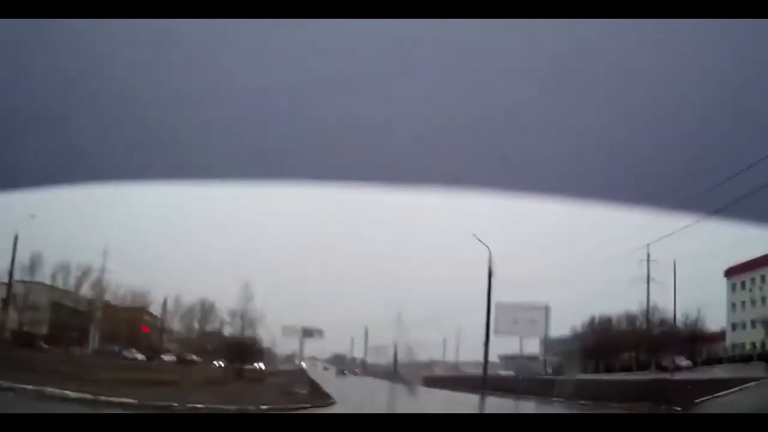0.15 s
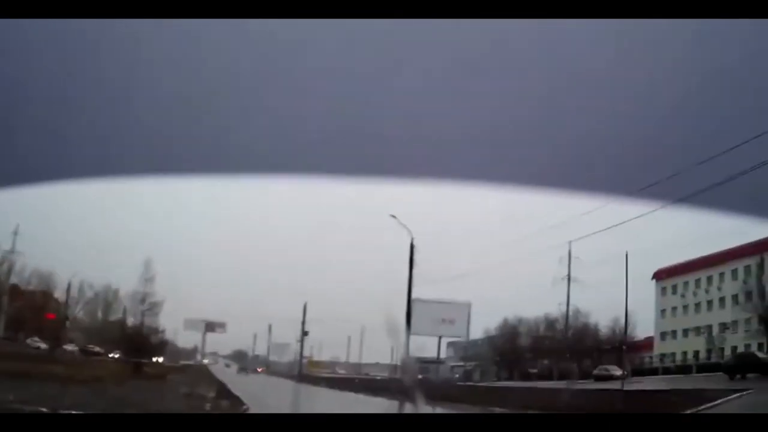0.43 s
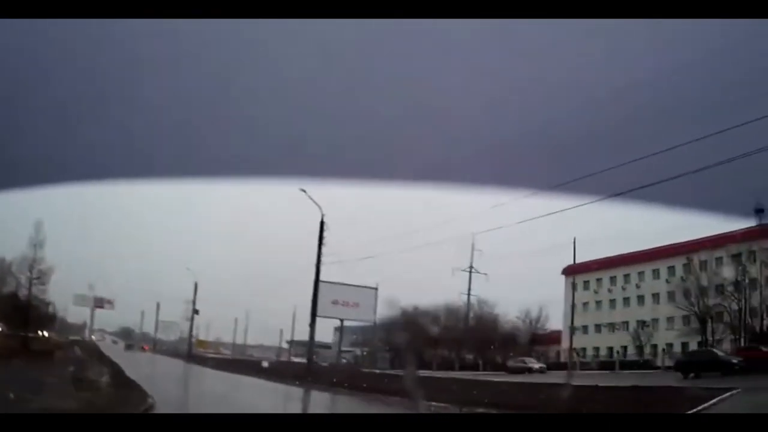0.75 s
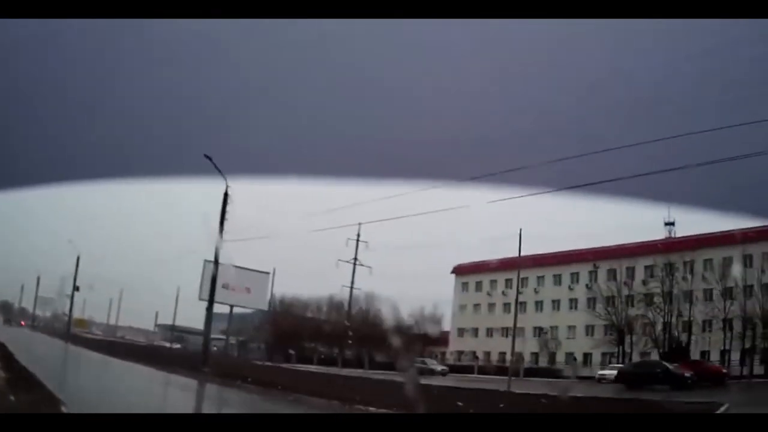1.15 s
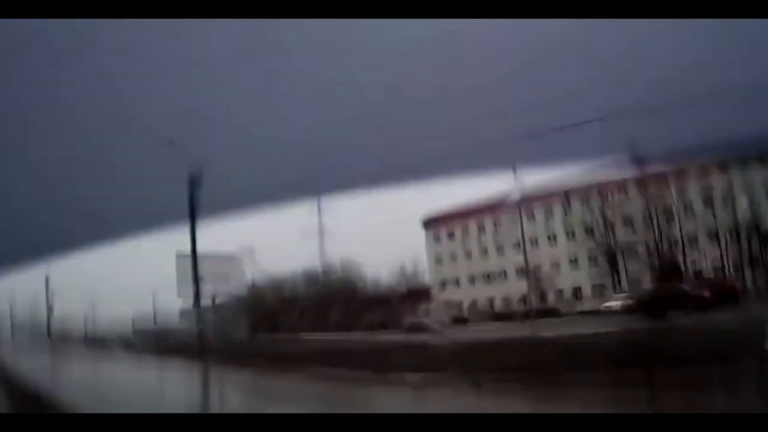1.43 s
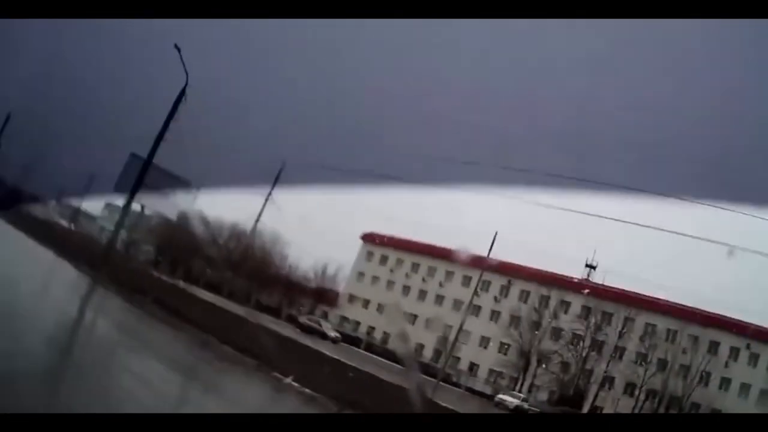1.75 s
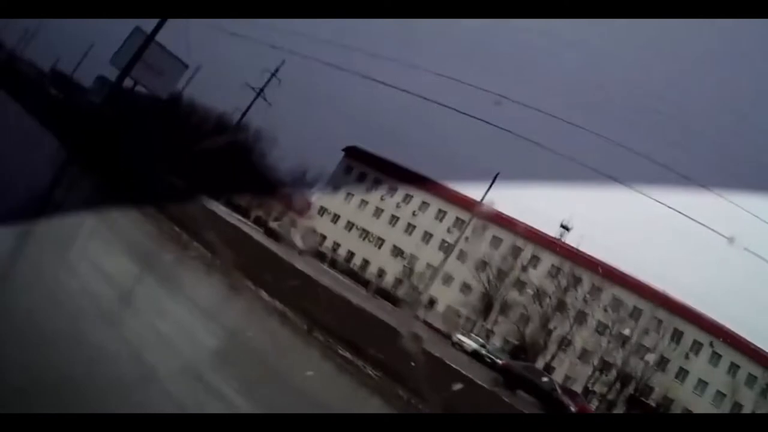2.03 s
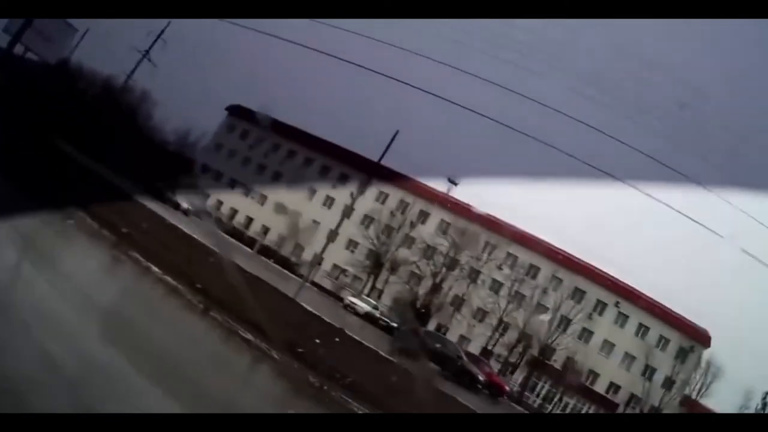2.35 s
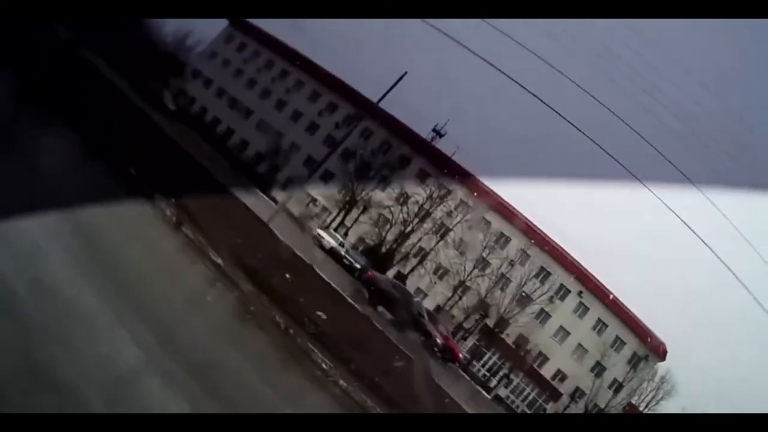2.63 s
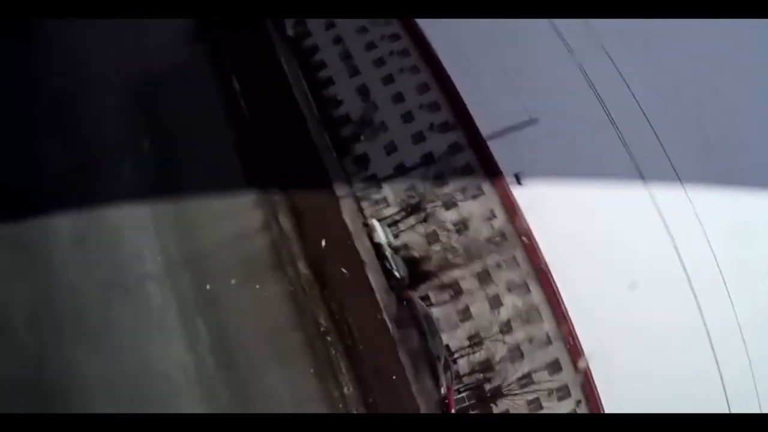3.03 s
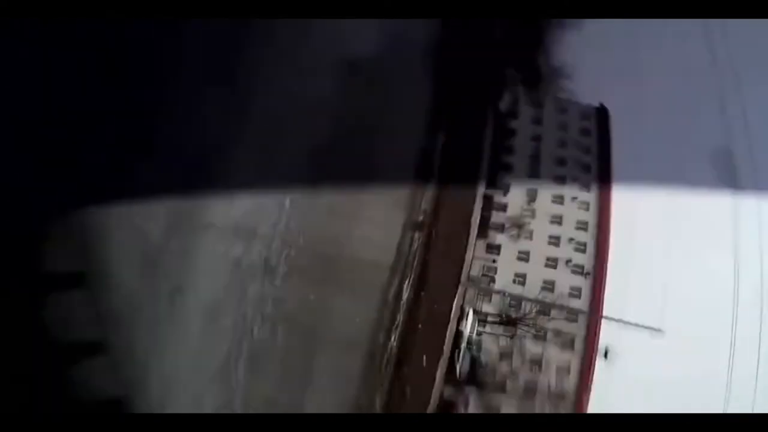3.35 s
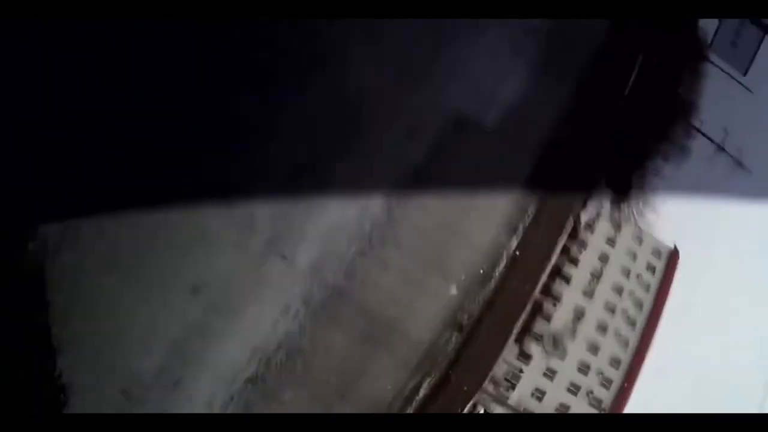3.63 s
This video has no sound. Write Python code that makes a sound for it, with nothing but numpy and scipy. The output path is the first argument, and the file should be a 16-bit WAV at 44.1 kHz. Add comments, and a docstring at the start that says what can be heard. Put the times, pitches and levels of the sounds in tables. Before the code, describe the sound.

A car crash heard inside the cabin: tyre roar and rattling trim, a rough squeal sagging in pitch, a hard kerb thump, then tumbling thuds, panel knocks and cracking plastic and glass, close dashboard microphone.

```python
"""Car skid and rollover, heard inside

A car skids sideways on wet asphalt, strikes a kerb and rolls over, heard by one dashboard microphone.
Tyre roar and body grind are noise in octave bands; squeal and cabin booms are narrow noise bands.
The body thuds as sagging sines, knocks ring panel modes, and loose plastic and glass crack as
noise bursts that ring the trim, over a bed of debris clicks and hiss.
"""
import sys
import numpy as np
from scipy import signal
from scipy.fft import rfft, irfft
from scipy.io import wavfile

SR = 44100
rng = np.random.default_rng(int(sys.argv[2]) if len(sys.argv) > 2 else 0)


def dump(signal):
    """Clip the signal to [-1, 1] and save it as 16-bit WAV at the path in sys.argv[1]."""
    limited = np.clip(np.atleast_2d(signal).T, -1, 1)
    pcm = np.round(limited * 32767).astype(np.int16)
    wavfile.write(sys.argv[1], SR, pcm)


def boost(x):
    """Linear amplitude factor 10**(x/20) for a level x in decibels (scalar or array-like)."""
    u = np.asarray(x, float) / 20
    return 10 ** u


N = 167580


def rms_one(x):
    """Scale to rms 1."""
    return x / np.sqrt(np.mean(x ** 2) + 1e-20)


def in_time(rows):
    """Columns of a table as sample-rate curves."""
    s, *columns = np.transpose(rows)
    return [np.interp(np.arange(N) / SR, s, c) for c in columns]


def gated(rows):
    """1 inside a table's time span, with 15 ms fades outside it."""
    start, end = rows[0][0], rows[-1][0]
    return in_time([(start - .015, 0), (start, 1), (end, 1), (end + .015, 0)])[0]


def drift(rate_hz):
    """Slow chance of spread 1: low-passed noise made at 1/40 of the sample rate."""
    r = np.exp(-80 * np.pi * rate_hz / SR)
    noise = rng.standard_normal(N // 40 + 2002)
    slow = signal.lfilter([1], [1, -2 * r, r * r], noise)[2000:]  # drops the settling
    return np.interp(np.arange(N) / 40, np.arange(len(slow)), rms_one(slow))


def colour(x, spectrum):
    """Shape by a spectrum, closed outside its ends; rms 1."""
    hz, db = np.transpose(spectrum)
    log_hz = np.log(np.arange(N // 2 + 1) * SR / N + 1)
    gain = boost(np.interp(log_hz, np.log(hz), db, left=-90, right=-90))
    return rms_one(irfft(rfft(x) * gain, N))


def narrow(hz, half_width_hz, steady=0):
    """Noise band round a fixed or moving centre, its swell evened by the share steady; rms 1."""
    r = np.exp(-2 * np.pi * half_width_hz / SR)
    slow = signal.lfilter([1], [1, -2 * r, r * r], rng.standard_normal((2, N)))
    slow = slow / (np.hypot(*slow) + 1e-9) ** steady
    phase = 2 * np.pi * np.cumsum(hz + np.zeros(N)) / SR
    return rms_one(slow[0] * np.cos(phase) + slow[1] * np.sin(phase))


def ring(x, hz, t60_s):
    """A resonance of about gain 1 at its peak."""
    r = boost(-60 / (t60_s * SR))
    gain = (1 - r * r) / 2
    return signal.lfilter([gain, 0, -gain], [1, -2 * r * np.cos(2 * np.pi * hz / SR), r * r], x)


def bursts(times_s, levels_db, t60s, rise_s):
    """Sum of envelopes with a quick rise, a short shoulder and a quickening fall."""
    out = np.zeros(N + SR)
    t = np.arange(SR // 2) / SR
    for s, db, t60 in zip(times_s, levels_db, t60s):
        i = int(s * SR)
        fall_db = 60 * (t / np.clip(t60, .005, .4)) ** 1.278
        out[i:i + len(t)] += boost(db - fall_db) * (1 - np.exp(-t / rise_s))
    return out[:N]


JUDDER_HZ, JUDDER_SPREAD_HZ, JUDDER_DEPTH = 25.17, 4.946, 0.4


def judder():
    """An uneven throb of gain round 1, drawn anew at each call."""
    hz = JUDDER_HZ + JUDDER_SPREAD_HZ * drift(4.06)
    return 1 + JUDDER_DEPTH * np.sin(2 * np.pi * np.cumsum(hz) / SR)


# Rumble spectrum. Each row: frequency in Hz, density in dB per Hz.
RUMBLE_SPECTRUM = [(12, -34), (20, 0), (86, 0), (110, -19), (140, -26), (240, -120)]
# Shaking of the shell. Each row: time in seconds, relative levels of rumble, low boom, high boom in dB.
SHELL_SHAKE = [(0.0, -19.5, -26, -32.5), (0.25, -41, -24.5, -15.5), (1.08, -32, -27.5, -23),
               (1.1, -23, -26, -17.5), (1.78, -28, -22, -31.5), (2.01, -11, -20.5, -21),
               (2.15, -42, -19.5, -25.5), (2.56, -25, -27.5, -48), (2.58, -44, -49, -46),
               (2.62, -41, -14.5, -29.5), (2.79, -28, -28, -44.5), (3.22, -24, -14, -27.5),
               (3.44, -34, -33, -27.5), (3.8, -23, -23.5, -34)]
LOW_BOOM_HZ, LOW_BOOM_HALF_WIDTH_HZ = 136, 31.3
HIGH_BOOM_HZ, HIGH_BOOM_HALF_WIDTH_HZ = 328, 24


def cabin_booms():
    """Shell rumble and two cabin booms, the upper with its own uneven throb near 25 Hz throughout."""
    rumble_db, low_db, high_db = in_time(SHELL_SHAKE)
    rumble = colour(rng.standard_normal(N), RUMBLE_SPECTRUM)
    low = narrow(LOW_BOOM_HZ, LOW_BOOM_HALF_WIDTH_HZ)
    high = judder() * narrow(HIGH_BOOM_HZ, HIGH_BOOM_HALF_WIDTH_HZ)
    return boost(rumble_db - 12.5) * rumble + boost(low_db - 5.5) * low + boost(high_db - 3.0) * high


# Spectrum of loose plastic and glass. Each row: frequency in Hz, density in dB per Hz.
CRACK_SPECTRUM = [(1940, 2), (3300, 2.5), (3660, -2.5), (4300, 3), (4650, 0), (8220, -4.5), (9480, 0),
                  (11600, -9), (15500, -24.5)]
# Debris bed. Each row: time in seconds, level in dB.
DEBRIS_LEVEL = [(0.0, -43.5), (0.19, -46.5), (0.53, -45), (1.05, -49.5), (1.39, -47.5), (1.52, -39.5),
                (1.7, -44.5), (2.14, -48), (2.35, -49.5), (2.87, -53), (3.03, -45), (3.49, -45.5),
                (3.72, -45), (3.8, -36)]
MEDIAN_CLICKS_PER_S, HISS_DB_RE_CLICKS = 3400, -4


def debris():
    """Shaken debris: random clicks of uneven rate and size, with hiss."""
    chance = MEDIAN_CLICKS_PER_S * boost(6 * drift(30)) / SR
    size = boost(3.8 * np.minimum(rng.exponential(1, N), 5))
    clicks = (rng.random(N) < chance) * size * rng.choice([-1, 1], N)
    bed = rms_one(clicks) + boost(HISS_DB_RE_CLICKS) * rng.standard_normal(N)
    return boost(in_time(DEBRIS_LEVEL)[0]) * colour(bed, CRACK_SPECTRUM)


# Roar spectrum. Each row: frequency in Hz, density in dB per Hz.
ROAR_SPECTRUM = [(15, -47), (25, -9), (86, -11.5), (114, -31), (146, 0), (180, -12), (237, -6.5),
                 (334, -6.5), (429, -5.5), (1280, -8.5), (1600, -19.5), (2510, -23.5), (3880, -50),
                 (6000, -61.5), (7800, -123)]
# Tyre scrub and body grind. Each row: time in seconds, relative level in dB,
# brightness in dB per octave above 800 Hz.
CONTACT = [(0, -22, 2), (.08, -30, 3), (.2, -22, 4.5), (.38, -19, 3), (1.1, -24.5, 5), (1.44, -25.5, 4.5),
           (1.5, -24.5, 1.5), (1.62, -20, -1), (1.75, -28.5, -2), (1.85, -29.5, -5), (1.92, -23.5, -1),
           (2.03, -28, 0), (2.2, -34.5, -4.5), (2.45, -28, -6), (2.55, -41.5, -2), (2.95, -41.5, -1),
           (3.03, -32.5, -3.5), (3.15, -23.5, -9), (3.235, -37, 1.5), (3.25, -21, 0), (3.29, -21, -4),
           (3.33, -19, 2), (3.44, -16.5, 5), (3.465, -30.5, 1.5), (3.53, -27.5, 5.5), (3.56, -22.5, -6.5),
           (3.67, -18, 1.5), (3.69, -35, 8), (3.76, -24.5, 6), (3.8, -15, 7.5)]
KERB_S, SKID_LUMP_DB, WRECK_LUMP_DB, BAND_LUMP_DB = 1.47, 0.83, 2.2, 0.83 * 2.03


def grind():
    """Rubber, then bodywork on the ground: octave bands of noise, lumpier after the kerb."""
    level_db, tilt = in_time(CONTACT)
    spectrum = rfft(colour(rng.standard_normal(N), ROAR_SPECTRUM))
    octave = np.log2((np.arange(N // 2 + 1) * SR / N + 1) / 800)
    lumps = drift(22)
    skidding = np.arange(N) < KERB_S * SR
    lump_db = np.where(skidding, SKID_LUMP_DB * lumps, WRECK_LUMP_DB * (lumps + drift(88)))
    out = 0
    for k in range(-5, 4):
        band = irfft(spectrum * np.clip(1 - abs(octave - k), 0, 1), N)
        out = out + band * boost(tilt * max(k, 0) + BAND_LUMP_DB * drift(25) + lump_db)
    return boost(level_db + 2.5) * out


# Short whine as the slide begins. Each row: time in seconds, pitch in Hz, level in dB.
WHINE_PATH = [(0.13, 1009, -38), (0.232, 1018, -24), (0.4, 1022, -27)]


def whine():
    """A very narrow noise band, almost a tone."""
    hz, db = in_time(WHINE_PATH)
    return gated(WHINE_PATH) * boost(db) * narrow(hz, 6.6)


# Scrape. Each row: time in seconds, pitch in Hz, level in dB.
SCRAPE_PATH = [(3.55, 420, -21), (3.562, 1000, -22), (3.595, 1400, -26)]


def scrape():
    """A noise band that climbs in pitch as the contact slides off a panel."""
    hz, db = in_time(SCRAPE_PATH)
    return gated(SCRAPE_PATH) * boost(db) * narrow(hz, 73)


# Tyre squeal. Each row: time in seconds, mean pitch in Hz, relative level in dB.
SQUEAL_PATH = [(.6, 870, -23), (.7, 895, -16), (.76, 860.6, -25), (.81, 896.4, -13), (.85, 878.6, -9.5),
               (.885, 836, -25), (.95, 854, -15), (1.0, 820, -14), (1.07, 808, -12.5), (1.25, 803.6, -13),
               (1.31, 791, -20), (1.35, 730, -10.5), (1.385, 725, -15.5), (1.42, 738, -14),
               (1.466, 690, -13.5)]
SQUEAL_HALF_WIDTH_HZ, SQUEAL_WOBBLE_HZ, SQUEAL_STEADY = 34, 9, .4


def squeal():
    """Stick-slip of the rubber: a rough, throbbing narrow band that sags as the car slows."""
    hz, db = in_time(SQUEAL_PATH)
    wobbling_hz = hz + SQUEAL_WOBBLE_HZ * drift(14.0)
    tone = narrow(wobbling_hz, SQUEAL_HALF_WIDTH_HZ, SQUEAL_STEADY)
    return gated(SQUEAL_PATH) * boost(db - 2.0) * judder() * tone


# Body thuds. Each row: start in seconds, level in dB, starting pitch in Hz, ring t60 in seconds.
THUD_HITS = [(1.468, 2, 326, 0.028), (1.598, -10.5, 220, 0.023), (1.612, -4.5, 472, 0.022),
             (1.928, -10, 160, 0.038), (2.016, 0, 166, 0.022), (2.049, -13, 154, 0.11),
             (2.084, -11, 145, 0.046), (2.095, -5.5, 222, 0.032), (2.581, -12.5, 347, 0.028),
             (2.622, -8.5, 221, 0.054), (2.632, -4.5, 141, 0.053), (2.853, -22, 355, 0.074),
             (2.992, -5, 191, 0.041), (3.021, -15, 142, 0.18), (3.098, -7.5, 156, 0.05),
             (3.124, -5, 152, 0.064), (3.145, -5, 133, 0.05), (3.194, 0.5, 156, 0.023),
             (3.213, -8.5, 149, 0.068), (3.312, -13, 143, 0.097), (3.393, -15, 206, 0.085),
             (3.544, -13.5, 284, 0.047), (3.609, -11, 262, 0.034)]
THUD_PHASE_SAG_PER_S, THUD_FADE_POWER, THUD_RISE_S, THUD_ROUGH = 1.03, 2, .002, .4


def thuds():
    """Body blows: low sines that sag in pitch, hold briefly and die, roughened in level."""
    out, t = np.zeros(N + SR), np.arange(SR // 2) / SR
    rise = 1 - np.exp(-t / THUD_RISE_S)
    for s, db, hz, t60 in THUD_HITS:
        i = int(s * SR)
        fall_db = 60 * (t / np.clip(t60, .01, .6)) ** THUD_FADE_POWER
        tone = np.sin(2 * np.pi * hz * t * (1 - THUD_PHASE_SAG_PER_S * t))
        out[i:i + len(t)] += boost(db - fall_db) * rise * tone
    rough = out[:N] * (1 + THUD_ROUGH * drift(187))
    return signal.sosfilt(signal.butter(2, 100, "high", fs=SR, output="sos"), rough)


# Knocks on panels and trim. Each row: start in seconds, relative level in dB, scuff t60 in seconds.
KNOCK_HITS = [(1.467, -4, 0.047), (1.518, -18, 0.044), (1.606, -11, 0.09), (1.78, -15.5, 0.085),
              (1.894, -14.5, 0.052), (1.948, -8, 0.032), (1.954, -2.5, 0.029), (1.988, -1.5, 0.023),
              (2.1075, 3.5, 0.017), (2.126, -30, 0.029), (2.191, -18, 0.031), (2.235, -19, 0.042),
              (2.268, -12, 0.047), (2.276, -7.5, 0.051), (2.31, -32, 0.019), (2.37, -23.5, 0.078),
              (2.439, -13, 0.018), (2.447, -13, 0.045), (2.582, -25, 0.025), (2.626, -20, 0.017),
              (2.638, -22, 0.014), (3.093, -21.5, 0.053), (3.245, -30, 0.032), (3.259, -17, 0.053),
              (3.314, -11, 0.075), (3.402, -9.5, 0.074), (3.421, -18, 0.05), (3.474, -10.5, 0.023),
              (3.504, -5.5, 0.013), (3.536, -4, 0.035), (3.61, -7, 0.047), (3.627, -14, 0.05),
              (3.659, -14, 0.17)]
# Panel modes. Each row: frequency in Hz, relative gain in dB, t60 in seconds.
PANEL_MODES = [(800, 0, .035), (890, 2, .055), (1150, -4, .03), (700, -9, .03), (1290, -5, .03),
               (520, -10, .03), (1600, -12, .03), (2300, -16, .02)]
SCUFF_GAIN_DB, STRIKE_GAIN_DB, SOFT_CONTACT_HZ = 3, 19.5, 1650


def knocks():
    """A strike and a short soft scuff of noise set the panel modes ringing."""
    s, db, t60 = np.transpose(KNOCK_HITS)
    push = bursts(s, db + SCUFF_GAIN_DB, t60, rise_s=0.00018) * rng.standard_normal(N)
    push[(s * SR).astype(int)] += boost(db + STRIKE_GAIN_DB)
    push = signal.sosfilt(signal.butter(2, SOFT_CONTACT_HZ, fs=SR, output="sos"), push)
    return sum(boost(gain_db + 9.5) * ring(push, hz, t) for hz, gain_db, t in PANEL_MODES)


# Loose plastic and glass. Each row: start in seconds, relative level in dB,
# trim ring in dB re that level, t60 in seconds.
CRACK_HITS = [(0.033, -14.5, 3, 0.058), (0.148, -22, -4, 0.075), (0.2408, -19, 2, 0.024),
              (0.347, -19.5, 12, 0.032), (0.39, -11, -17, 0.044), (0.442, -17.5, -12, 0.034),
              (0.5022, -11, 16, 0.06), (0.622, -23, 4, 0.052), (0.66, -22, -14, 0.045),
              (0.7597, 0, 4, 0.052), (0.9352, -27.5, -16, 0.2), (1.062, -25, -15, 0.06),
              (1.0854, -25, -6, 0.052), (1.3229, -11, 2, 0.052), (1.3805, -21.5, -14, 0.035),
              (1.47, -12.5, 2, 0.047), (1.5063, -10.5, -25, 0.025), (1.534, -26, -5, 0.058),
              (1.5575, -17.5, 0, 0.047), (1.574, -14.5, -7, 0.051), (1.601, -15.5, -15, 0.069),
              (1.616, -20.5, 11, 0.081), (1.8945, -19.5, 13.5, 0.052), (1.93, -21, -12, 0.14),
              (1.9848, -11, -5, 0.056), (2.0062, -2.5, 1.5, 0.035), (2.0857, -18, -2, 0.062),
              (2.1061, -11, 18, 0.022), (2.1875, -13.5, -11, 0.059), (2.2626, -22.5, 6.5, 0.088),
              (2.3057, -25, -22, 0.029), (2.3625, -22.5, -6, 0.084), (2.4399, -27, -15, 0.05),
              (2.578, -17.5, -34, 0.076), (2.6148, -14, -6.5, 0.056), (2.6628, -22.5, -24, 0.026),
              (2.7077, -23.5, -18, 0.033), (2.799, -23, -14, 0.033), (2.9297, -37, 8, 0.027),
              (2.997, -27, 8.5, 0.038), (3.021, -20.5, -4, 0.06), (3.07, -20, -10, 0.034),
              (3.124, -20.5, 8, 0.044), (3.146, -30, 10, 0.074), (3.1744, -15.5, -1, 0.038),
              (3.241, -14.5, -17, 0.036), (3.2575, -9.5, 11, 0.084), (3.3244, -16.5, -4, 0.071),
              (3.3385, -8, -18, 0.036), (3.352, -3, -16, 0.018), (3.363, 3, 1, 0.052),
              (3.384, -8, -23, 0.053), (3.4008, 1, -8, 0.034), (3.415, 1, 0, 0.033),
              (3.4305, -4.5, 6.5, 0.037), (3.4742, -5.5, 10.5, 0.034), (3.501, -14.5, -16, 0.11),
              (3.5339, -6.5, 13.5, 0.068), (3.5584, -18.5, 11, 0.32), (3.608, -8, 4, 0.088),
              (3.633, -22, 20, 0.058), (3.6527, -10.5, 2, 0.075), (3.708, -11, 5, 0.036),
              (3.7743, -19.5, -3, 0.23)]
# Crack brightness. Each row: time in seconds, dB added to the treble and taken from the rest.
CRACK_BRIGHTNESS = [(0.2, -1.5), (0.76, 3), (1.4, 5.5), (1.6, 0.1), (3.3, 2.5)]
# Trim modes. Each row: frequency in Hz, gain in dB, t60 in seconds.
TRIM_MODES = [(1630, -4, 0.082), (2003, -4, 0.0043), (2397, -2, 0.009), (2690, -1.5, 0.032),
              (2930, -6, 0.017), (3260, -31, 0.045)]
CRACK_GAIN_DB, TRIM_GAIN_DB, TRIM_SPREAD_DB = -13.5, -3, 4
CRACK_RISE_S, SNAP_DB, GRAIN_DB, CHANCE_TILT_DB, SPLIT_HZ = .0012, 17, 2.5, 2, 7000


def cracks():
    """Grainy bursts, each duller or brighter by chance, that snap against and ring the trim."""
    s, db, trim_db, t60 = np.transpose(CRACK_HITS)
    grain = rms_one(boost(GRAIN_DB * drift(350)))
    chance_tilt = np.tanh(rng.standard_normal(len(s)))
    tilt_db = CHANCE_TILT_DB * chance_tilt + np.interp(s, *np.transpose(CRACK_BRIGHTNESS))

    noise = colour(rng.standard_normal(N), CRACK_SPECTRUM)
    dull = signal.sosfiltfilt(signal.butter(2, SPLIT_HZ, fs=SR, output="sos"), noise)
    dull_bursts = dull * bursts(s, db + CRACK_GAIN_DB - tilt_db, t60, CRACK_RISE_S)
    treble_bursts = (noise - dull) * bursts(s, db + CRACK_GAIN_DB + tilt_db, t60, CRACK_RISE_S)

    # each crack shares its power among the trim modes by chance
    share_db = TRIM_SPREAD_DB * rng.standard_normal((len(s), len(TRIM_MODES)))
    mean_power = np.mean(boost(2 * share_db), axis=1, keepdims=True)
    share_db = share_db - 10 * np.log10(mean_power)
    push = rng.standard_normal(N) * grain
    push[((s + CRACK_RISE_S) * SR).astype(int)] += boost(SNAP_DB)
    push = signal.sosfilt(signal.butter(4, 3400, fs=SR, output="sos"), push)
    trim = 0
    for (hz, gain_db, ring_s), mode_db in zip(TRIM_MODES, share_db.T):
        envelope = bursts(s, db + trim_db + TRIM_GAIN_DB + mode_db, t60, CRACK_RISE_S)
        trim = trim + boost(gain_db) * ring(push * envelope, hz, ring_s)
    return grain * (dull_bursts + treble_bursts) + trim


def scene():
    """All sources at one microphone, nearly mono; a faint noisy side signal is added."""
    mono = cabin_booms() + debris() + grind() + whine() + scrape() + squeal() + thuds() + knocks() + cracks()
    treble = signal.sosfilt(signal.butter(2, 4500, "high", fs=SR, output="sos"), mono)
    side = boost(-29.5) * treble * rng.standard_normal(N) + boost(-39.5) * mono * drift(12)
    return np.array([mono + side, mono - side])


def top_cut(x):
    """Nothing passes above the cut-off."""
    return signal.sosfilt(signal.butter(12, 15980, fs=SR, output="sos"), x)


def record(dry):
    """The dashboard leaves a dip in the middle range; peaks clip at full scale."""
    dip_hz, dip_width_hz, dip_share = 1340, 300, 0.33
    dip_t60_s = np.log(1000) / (np.pi * dip_width_hz)
    dipped = dry - dip_share * ring(dry, dip_hz, dip_t60_s)
    clipped = np.clip(dipped, -1, 1)
    return top_cut(clipped)


dry = scene()
out = record(dry)
dump(out)
```